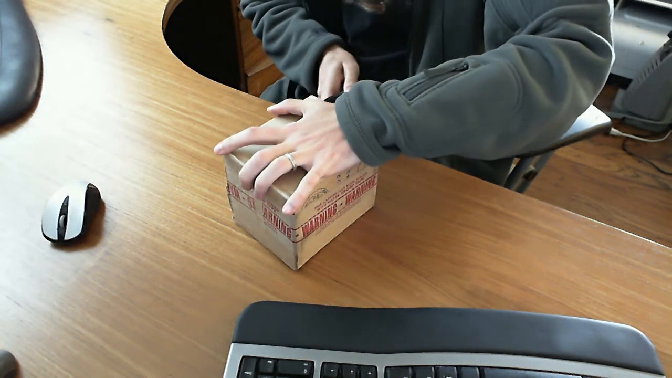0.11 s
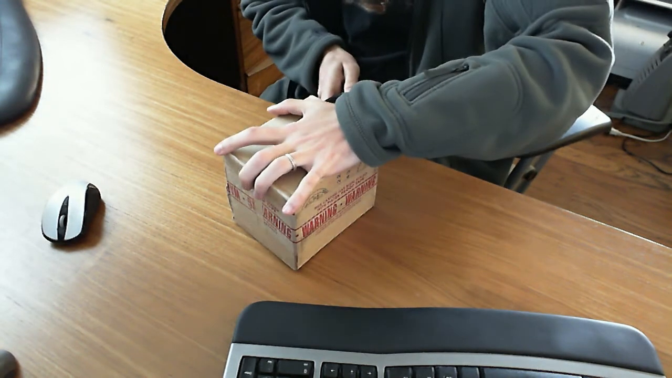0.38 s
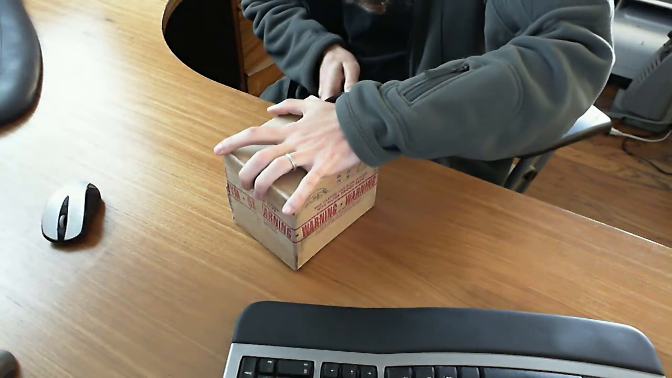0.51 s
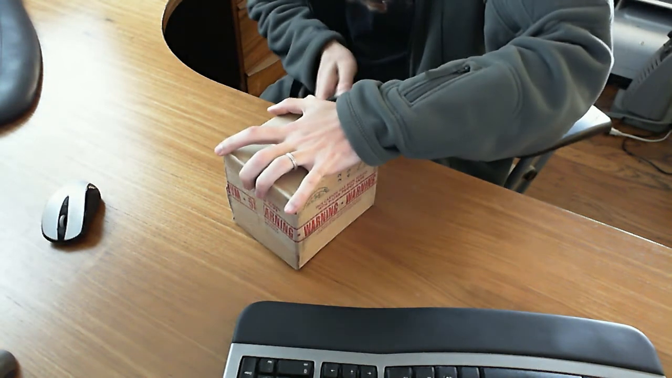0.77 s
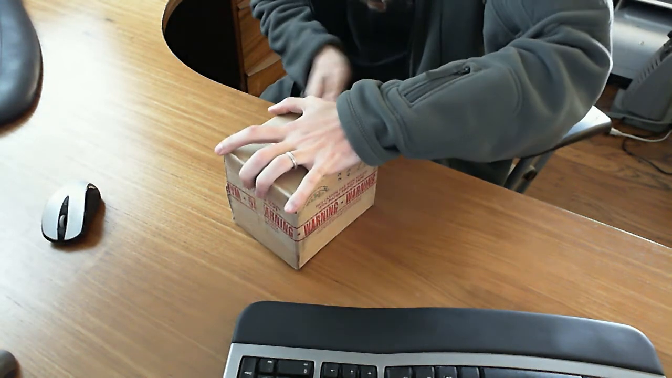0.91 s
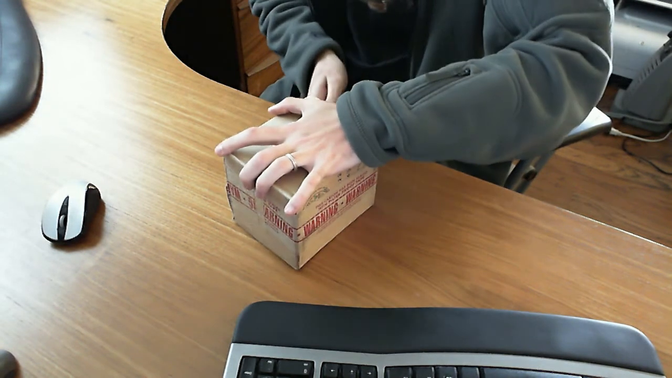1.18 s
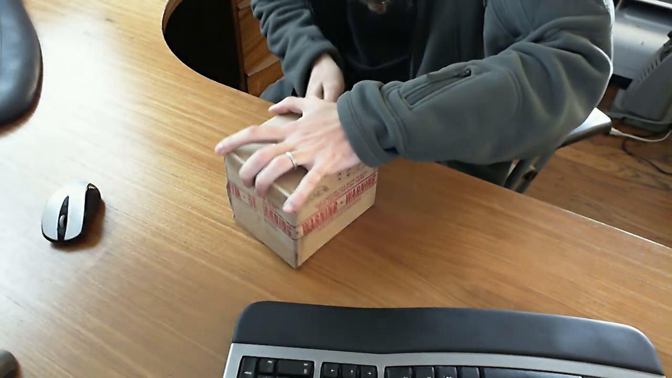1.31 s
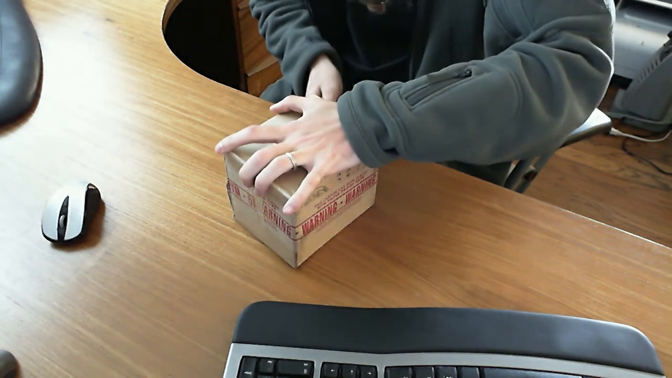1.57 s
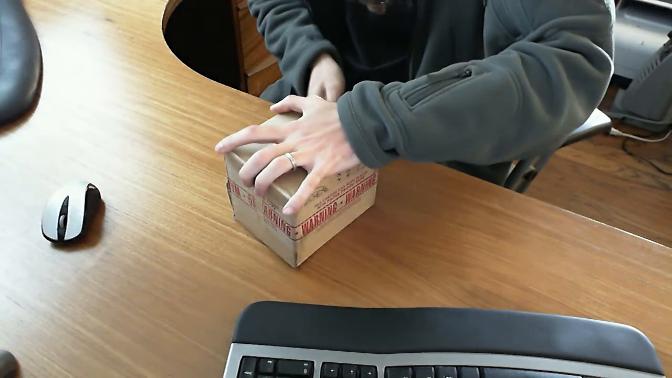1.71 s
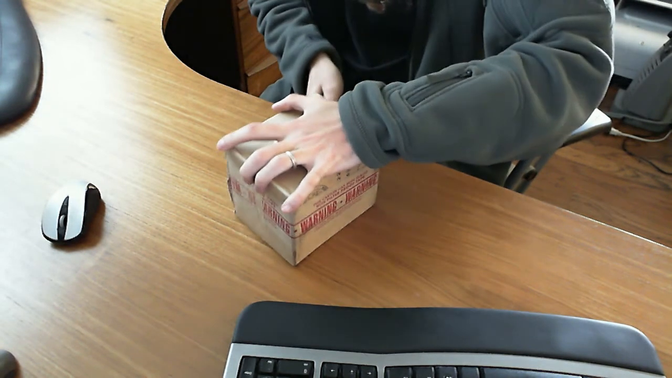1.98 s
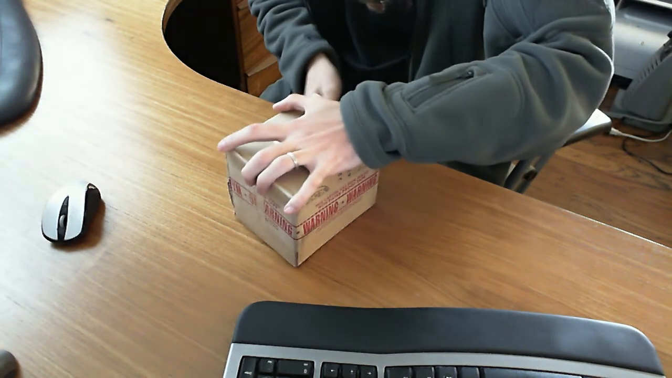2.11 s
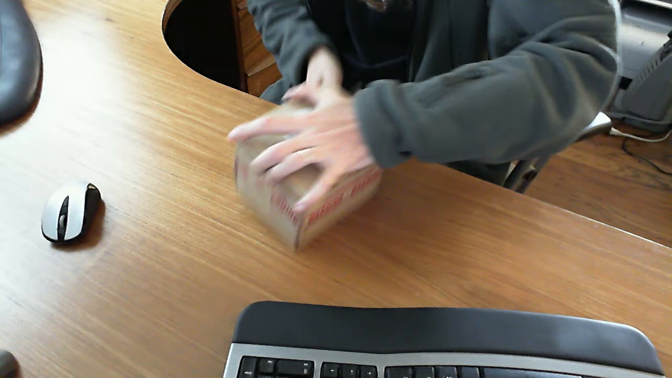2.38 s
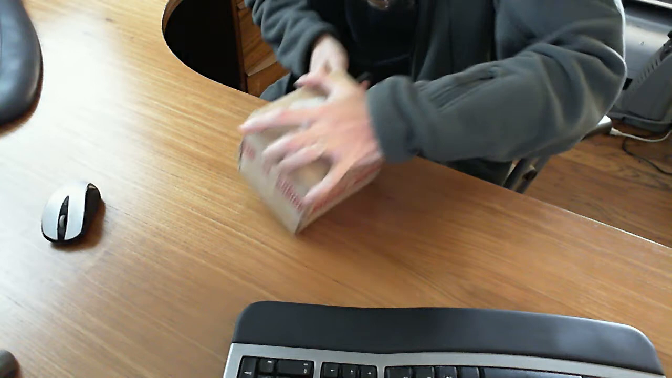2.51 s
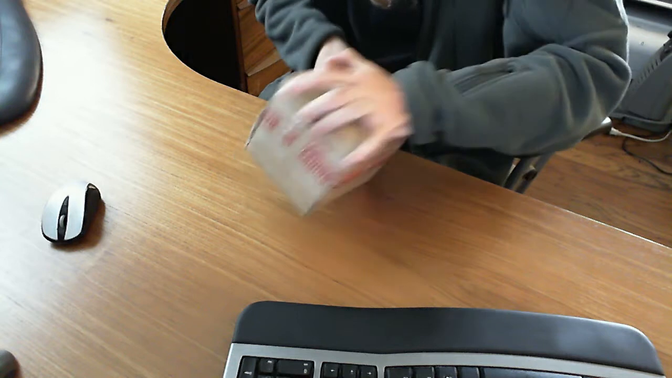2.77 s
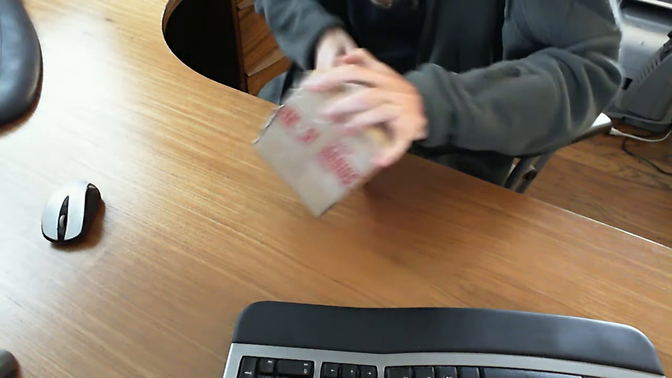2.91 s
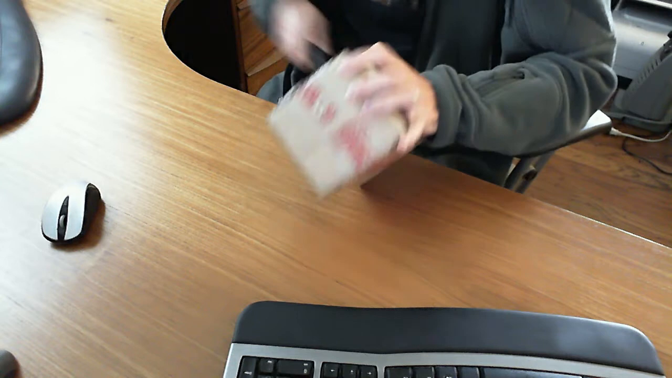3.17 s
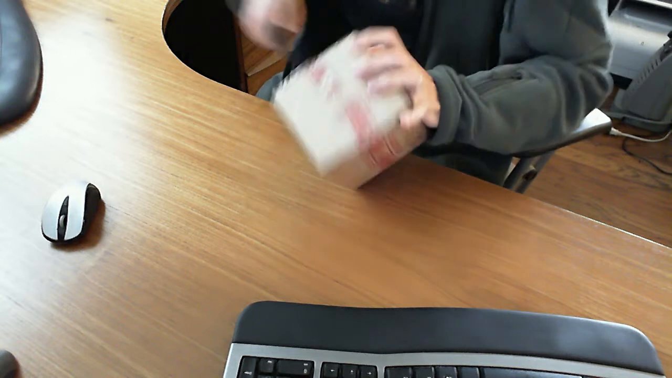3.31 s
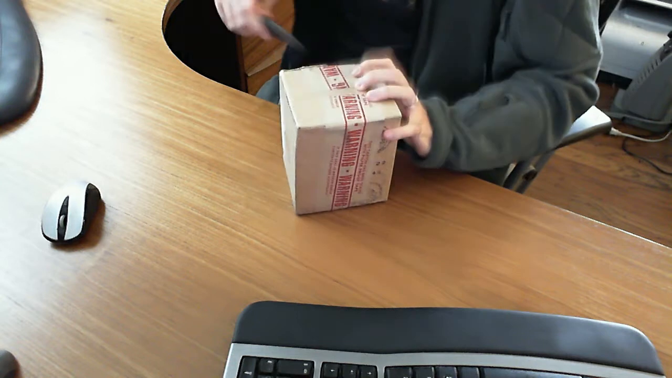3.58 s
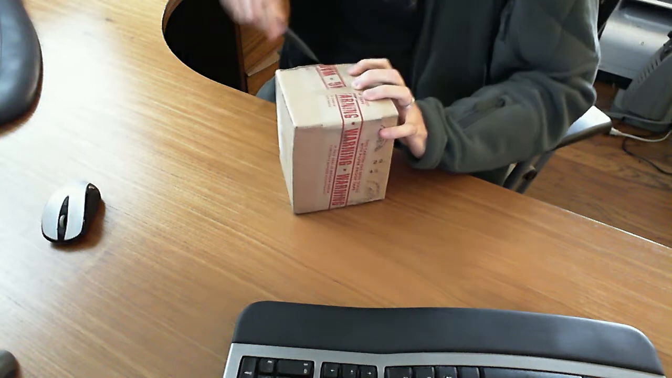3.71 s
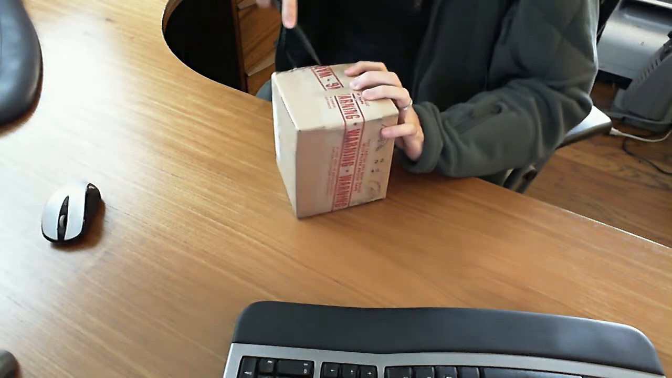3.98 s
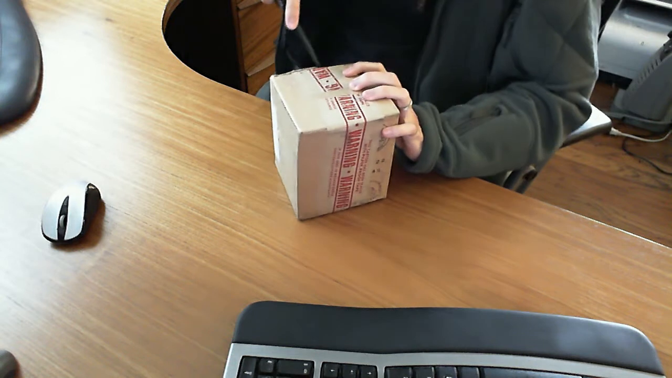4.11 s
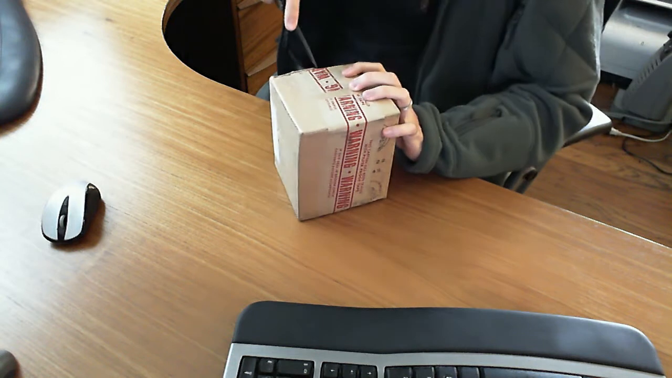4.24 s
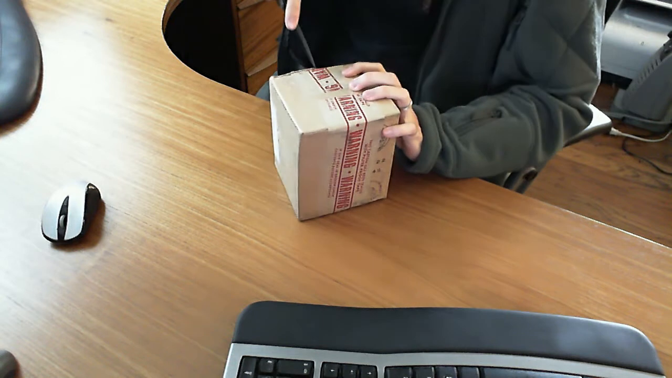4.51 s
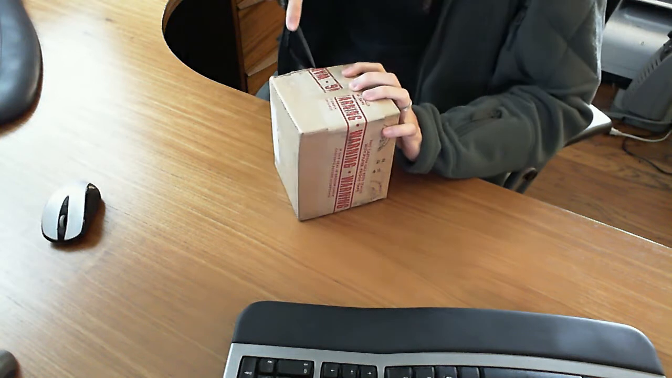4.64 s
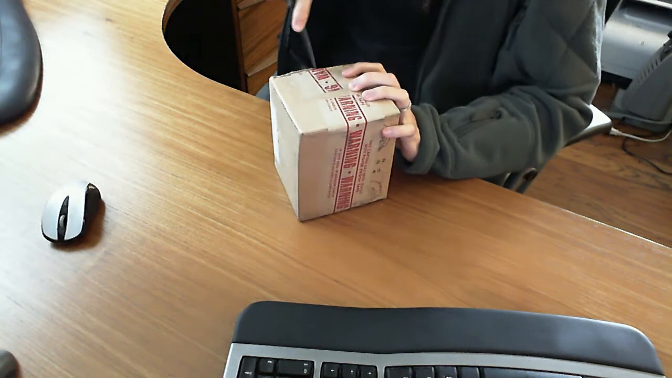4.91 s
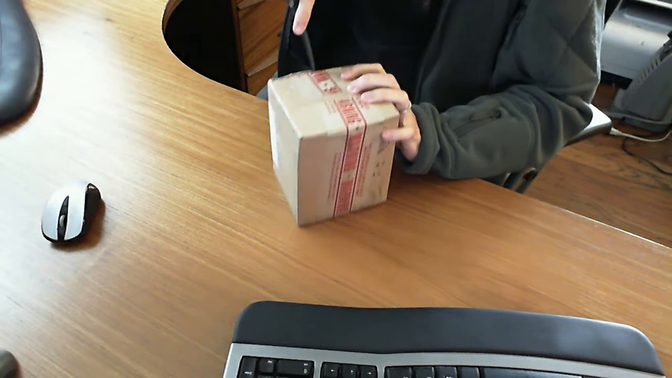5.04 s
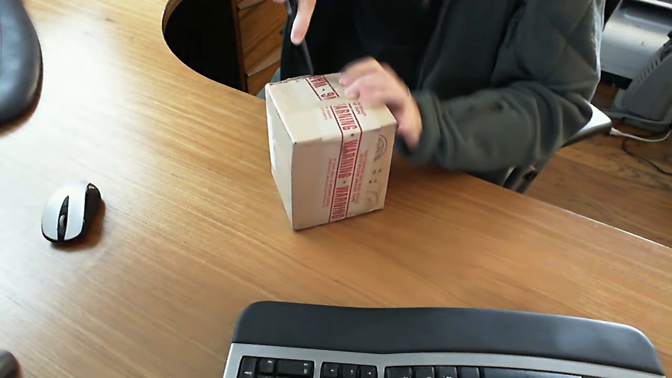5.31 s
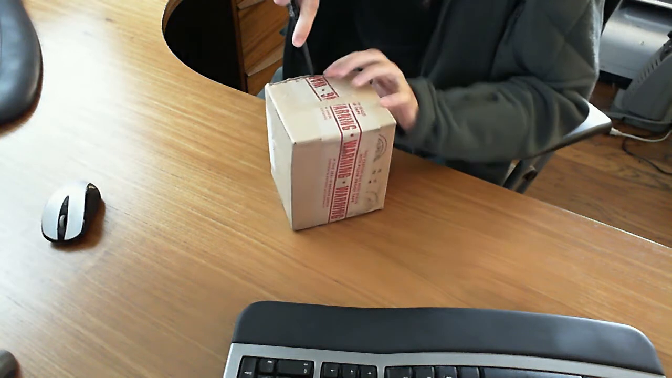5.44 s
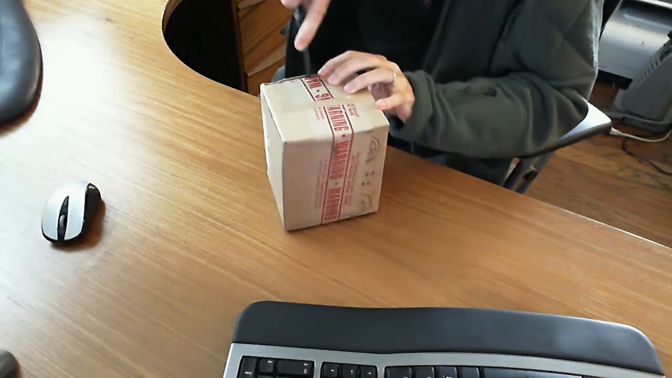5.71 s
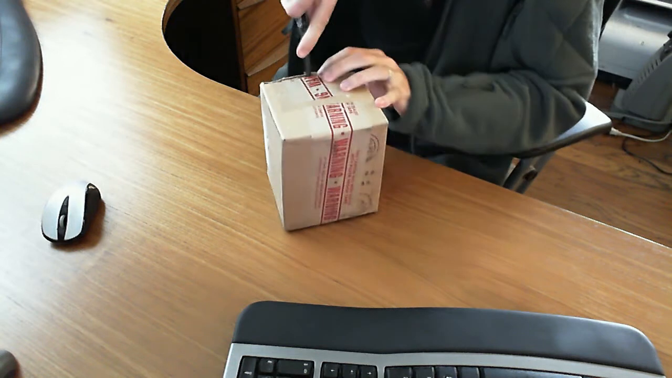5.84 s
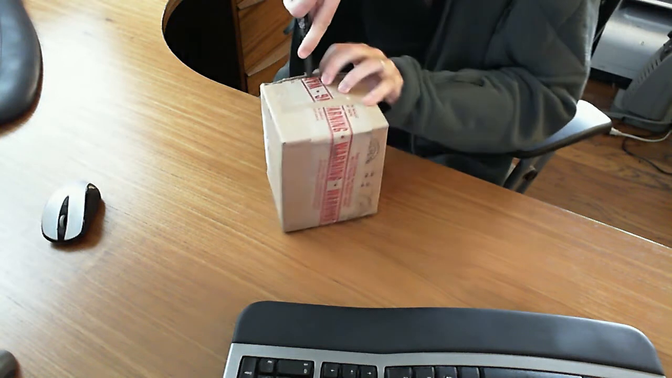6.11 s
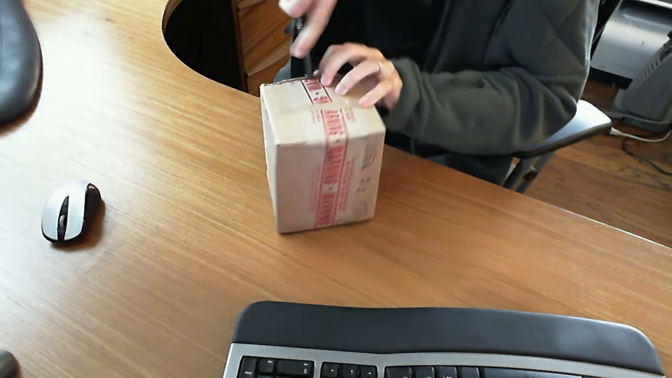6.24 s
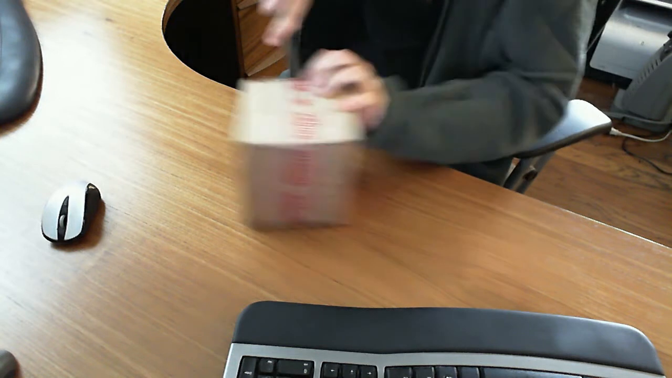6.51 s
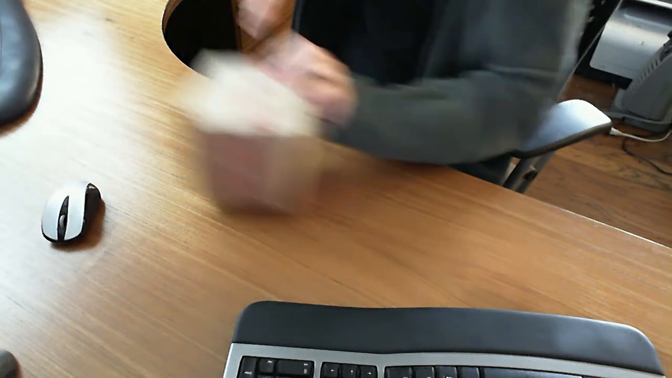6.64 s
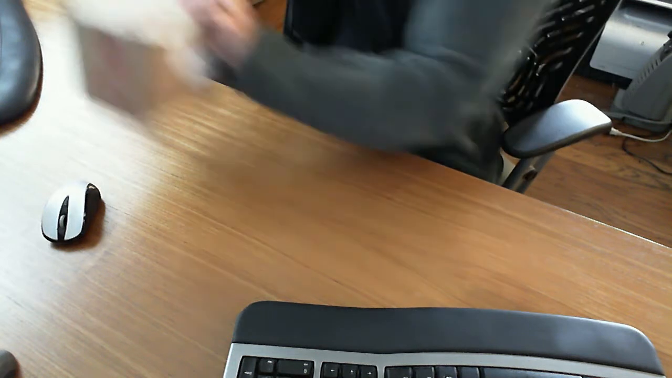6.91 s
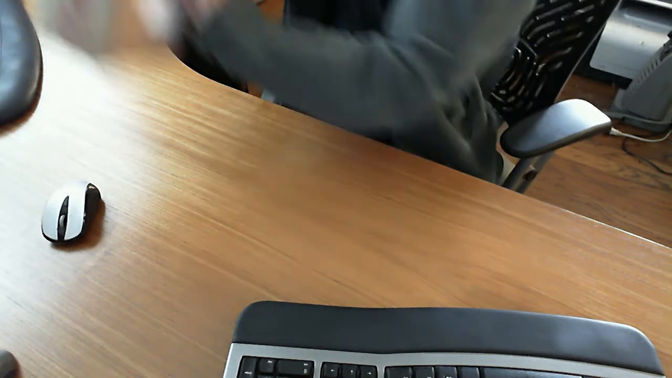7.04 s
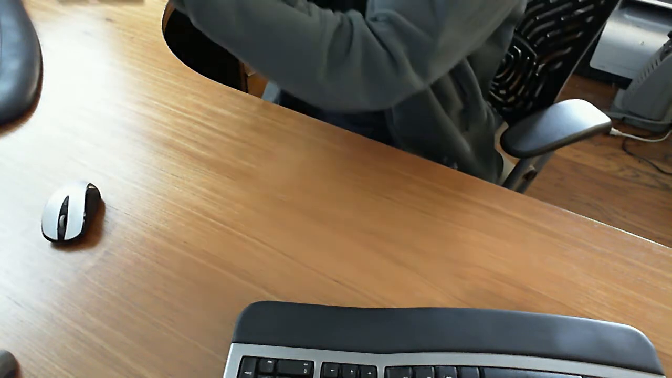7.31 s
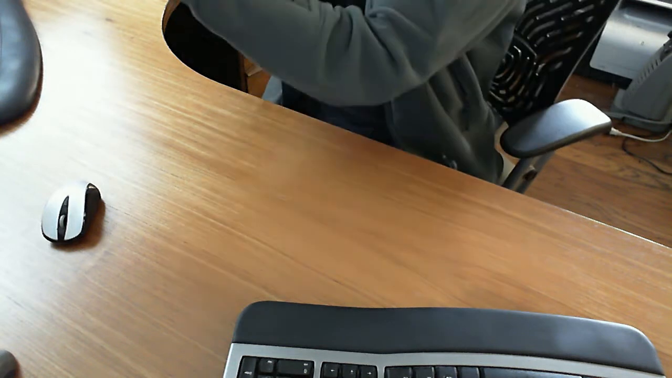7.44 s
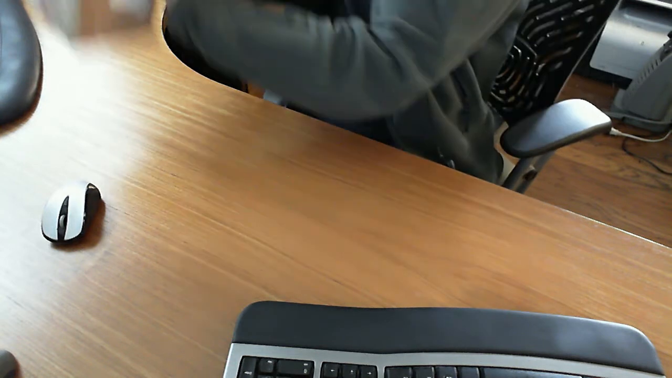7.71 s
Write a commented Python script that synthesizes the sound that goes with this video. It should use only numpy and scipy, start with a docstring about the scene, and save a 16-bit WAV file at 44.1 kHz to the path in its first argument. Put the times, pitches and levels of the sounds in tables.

```python
"""Room hum, faint fan lines, hiss and a pulsing sensor whine come first, as heard by a webcam microphone.
Nails and a blade then scrape tape on a small cardboard box: clumpy noise through film, nail and box colours.
Tape snaps are short noise cracks; knocks, landings and sliding drive resonances of the box and wooden desk.
Jolts make the desk tremble, a small quiet room answers the hits, and a slowly shifting offset is added."""
import sys
import numpy as np
from scipy import signal
from scipy.fft import rfft, irfft, next_fast_len
from scipy.io import wavfile
from scipy.ndimage import uniform_filter1d, map_coordinates

SR = 44100
rng = np.random.default_rng(int(sys.argv[2]) if len(sys.argv) > 2 else 0)


def boost(x):
    """Linear amplitude factor 10**(x/20) for a level x in decibels (scalar or array-like)."""
    u = np.asarray(x, float) / 20
    return 10 ** u


def dump_mix(stems):
    """Bounce the given channels to the path in sys.argv[1] as a 16-bit WAV at rate SR."""
    frames = np.atleast_2d(stems).T  # one column per channel
    limited = np.clip(frames, -1, 1)  # hard clip at full scale
    pcm = np.round(limited * 32767).astype(np.int16)
    wavfile.write(sys.argv[1], SR, pcm)


N = 342419  # length [samples]
TIME = np.arange(N) / SR  # [s]
STEPS = np.arange(0, N + 32, 32) / SR  # coarse clock for gains [s]


def unit(x):
    """Scale to rms 1."""
    return x / np.sqrt(np.mean(x ** 2) + 1e-20)


def along(points, hz):
    """Read a (frequency, value) curve on a log frequency axis."""
    f, value = np.transpose(points)
    return np.interp(np.log(hz + 1), np.log(f + 1), value)


def curves(rows):
    """One value per sample for each column after the time."""
    s, *columns = np.transpose(rows)
    return [np.interp(TIME, s, column) for column in columns]


def wobble(rate):
    """A smooth random curve with rate knots a second."""
    knots = rng.standard_normal(int(N * rate / SR) + 4)
    return map_coordinates(knots, [np.arange(N) * rate / SR])


def filtered(x, response):
    """Pass x through a complex response of frequency."""
    m = next_fast_len(N + SR // 2)
    return irfft(rfft(x, m) * response(np.fft.rfftfreq(m, 1 / SR)), m)[:N]


def modes(table, turn=-1):
    """Sum of resonances: neighbours swing in opposite phase (-1) or start together under a blow (1)."""
    def response(f):
        total = 0
        for k, (centre, width, db) in enumerate(table):
            damping = 1j * f * width
            total = total + turn ** k * boost(db) * damping / (centre ** 2 - f ** 2 + damping)
        return total
    return response


def push(s, db, ms):
    """A blow is a smooth raised-cosine force pulse; longer contact makes it duller."""
    force = np.zeros(N)
    shape = np.hanning(int(ms * SR / 1000) + 3)
    force[round(s * SR):][:len(shape)] = boost(db) * shape / shape.sum()
    return force


def summed(rest_db, parts):
    """Gain per sample: the power of a resting level plus that of all parts."""
    power = boost(rest_db) ** 2 + sum(part ** 2 for part in parts)
    return np.interp(TIME, STEPS, np.sqrt(power))


def swell(s, length, db):
    """A stroke presses in, is loudest at s and lets off."""
    edge_db, roundness = 12, 1.28  # drop at the stroke's ends; 1 is a pointed top, 2 a round one
    rise_share = 0.44  # part of the length spent rising
    side = length * np.where(STEPS < s, rise_share, 1 - rise_share)
    return boost(db - edge_db * np.abs((STEPS - s) / side) ** roundness)


def settle(s, db, t60, attack):
    """Quick rise, then a steady fade."""
    t = np.maximum(STEPS - s, 0)
    return boost(db - 60 * t / t60) * (1 - np.exp(-t / attack))


# spectrum of room hum and microphone hiss: (frequency [Hz], relative level per Hz [dB])
AIR = [(6, -26), (10, -3), (20, -15), (32, -21), (118, -18), (240, -22), (600, -28.5), (1270, -33.5),
       (2500, -37.5), (5300, -39.5), (8100, -38), (12000, -37.5), (15800, -34)]
# fan lines: (frequency [Hz], typical sine amplitude [dB])
FAN_LINES = [(180, -56.5), (235, -60)]


def air():
    """Shaped noise makes hum and hiss; fan lines waver in level and phase."""
    noise = unit(filtered(rng.standard_normal(N), lambda hz: boost(along(AIR, hz))))
    fan = 0
    for hz, db in FAN_LINES:
        level = boost(db + 2.1 * wobble(6.1))
        fan = fan + level * np.sin(2 * np.pi * hz * TIME + 0.26 * wobble(6.7))
    return boost(-45.5) * noise + fan


def whine():
    """The sensor's line clock leaks in while a frame is read and rests between frames."""
    line_hz, level_db = 6750.3, -53.5  # level of each of the two sines
    frame_s, read_from_s, read_for_s = 2 / 15, 0.12, 0.107
    reading = (TIME - read_from_s) % frame_s < read_for_s
    gate = uniform_filter1d(1.0 * reading, size=40)
    phase = 2 * np.pi * line_hz * TIME
    return gate * boost(level_db) * (np.sin(phase) + np.sin(2 * phase))


# added offset: (time [s], offset [full scale])
OFFSET = [(0, -.0537), (.86, -.0537), (.96, -.042), (3.5, -.042), (3.62, -.032), (5.95, -.032),
          (6.32, -.0176), (7.8, -.0176)]


def offset():
    """A constant shift of the waveform that glides between plateaus."""
    return curves(OFFSET)[0]


# box wall modes: (frequency [Hz], width [Hz], level [dB])
BOX = [(232.7, 56, 9), (347, 107, 4.5), (431, 60, 5), (480, 51, 5), (540, 66, 2.5), (640, 82, 2),
       (838, 152, -1), (1078, 94, -2), (1300, 124, -4.5), (1712, 170, -5), (2360, 280, -6.5),
       (3280, 360, -4.5)]


def wall(hz, spread):
    """Box modes heard from one wall: each loses spread dB per octave away from its pitch."""
    return modes([(c, w, db - spread * abs(np.log2(c / hz))) for c, w, db in BOX])


def grit(spiky_db, clump_db):
    """Stick-slip grains: noise whose size jumps from slip to slip and comes in clumps."""
    return rng.standard_normal(N) * boost(spiky_db * wobble(900) + clump_db * wobble(60))


def patchy(x, depth_db):
    """Narrow bands come and go as the material is held differently."""
    z = signal.stft(x, nperseg=512)[2]
    field = uniform_filter1d(rng.standard_normal(z.shape), size=3, axis=0)  # across frequency
    field = uniform_filter1d(field, size=16, axis=1)  # across time
    return unit(signal.istft(z * boost(depth_db * unit(field)), nperseg=512)[1][:N])


def tails(hits, under_db, t60):
    """Gains of the fading noise tail that follows each hit, at a level set by the hit."""
    return [settle(s, db + under_db, t60, attack=0.002) for s, db, _ in hits]


# strokes of nail, blade or hand: (loudest moment [s], length [s], tape hiss [dB],
# nail scrape relative to tape [dB], box body relative to tape [dB])
STROKES = [(0.606, 0.16, -42.5, -9.5, -0.5), (0.716, 0.4, -47, -11, -6), (0.846, 0.16, -39, -14, -11),
           (.888, 0.019, -29, 0, -7), (0.944, 0.15, -32.5, -6.5, -8.5), (1.076, 0.12, -27, -4.5, -6.5),
           (1.235, 0.16, -31, -4.5, -10.5), (1.378, 0.13, -31.5, -9.5, -15), (1.505, 0.12, -32.5, -5, -5),
           (1.691, 0.13, -32.5, -6.5, -10), (1.796, 0.15, -35.5, -7, -7), (2.105, 0.13, -39.5, -5.5, -7.5),
           (2.39, .3, -39, -6.5, -6.5), (2.763, 0.13, -44.5, -6, -21), (2.87, 0.58, -45, -9.5, -6.5),
           (3.315, 0.18, -43.5, -14, -15), (3.432, 0.31, -38.5, -17.5, -23), (3.51, 0.072, -33.5, -20, -12),
           (5.07, 0.44, -50.5, -5.5, -2), (5.37, 0.25, -48.5, -10, -8), (5.757, 0.15, -31.5, -10.5, -8),
           (6.053, 0.25, -44.5, -9, 5.5), (6.5, 0.72, -42, -5, -5), (6.721, 0.11, -41, 1.5, -6),
           (6.792, 0.18, -49.5, -1.5, 6.5), (7.004, 0.31, -51, -7.5, -5), (7.293, 0.057, -46, -6, -18),
           (7.433, 0.26, -47, -12, -7), (7.732, 0.053, -43.5, -17, -1.5)]
# tape hiss colour: (frequency [Hz], relative level per Hz [dB])
TAPE = [(2650, -43), (4500, -8), (5510, -9), (5990, -7), (6490, -4.5), (8370, 0), (10400, -5), (11900, -2),
        (13700, -9), (16000, -21.5)]
# nail and film modes: (frequency [Hz], width [Hz], relative level [dB])
NAIL = [(1464, 590, -1.5), (2286, 240, -1.5), (2900, 980, -3), (3830, 445, 4), (4640, 1400, -3.5)]


def rubbing():
    """Grains hiss in the tape film, rasp under the nail and drive the box walls; hits leave noise tails."""
    tape_parts = [swell(s, n, db) for s, n, db, _, _ in STROKES] + tails(SNAPS, -29.5, t60=0.32)
    nail_parts = [swell(s, n, db + up) for s, n, db, up, _ in STROKES] + tails(SNAPS, -41, t60=0.32)
    box_parts = [swell(s, n, db + up) for s, n, db, _, up in STROKES] + tails(KNOCKS, -32, t60=0.26)
    tape = filtered(grit(spiky_db=2.5, clump_db=1.2), lambda hz: boost(along(TAPE, hz)))
    nail = filtered(grit(spiky_db=2.5, clump_db=1.5), modes(NAIL))
    box = filtered(grit(spiky_db=1.0, clump_db=0.5), wall(574, spread=4.5))
    # resting levels are a faint steady noise floor
    tape = summed(-68, tape_parts) * patchy(tape, depth_db=2.1)
    nail = summed(-66.5, nail_parts) * patchy(nail, depth_db=3)
    box = summed(-57.5, box_parts) * patchy(box, depth_db=2.5)
    return tape + nail + box


# arms and box jolt the desk: (time [s], sway level [dB], boom level [dB], t60 [s])
JOLTS = [(.88, -42, -47.5, 1.7), (1.48, -30.5, -34.5, 0.62), (1.65, -46, -63, 2.2), (3.44, -23, -46, .6),
         (3.51, -30, -23, 0.62), (5.7, -45, -42, 1.5), (6.0, -45, -39.5, 2.3), (6.25, -40, -37, 0.55),
         (6.7, -62, -61, 1.8), (7.7, -52, -52, 1.2)]
# desk frame modes: (frequency [Hz], width [Hz], level [dB])
SWAY = [(30, 21, -3.5), (51.6, 26, 2.5)]
# desk top modes: (frequency [Hz], width [Hz], level [dB])
DESK = [(118, 12.6, -3), (142, 16, 2.5), (170.5, 30, -0.5), (249, 51, -3), (324, 114, -11.5)]


def tremble():
    """Noise through frame and top modes: the desk stirs at rest and trembles after each jolt."""
    attack = 0.027  # [s]
    sway_gain = summed(-55, [settle(s, db, t60, attack) for s, db, _, t60 in JOLTS])
    boom_gain = summed(-59, [settle(s, db, t60, attack) for s, _, db, t60 in JOLTS])
    sway = unit(filtered(rng.standard_normal(N), modes(SWAY)))
    boom = unit(filtered(rng.standard_normal(N), modes(DESK)))
    return sway_gain * sway + boom_gain * boom


# tape and nail snaps: (time [s], level [dB], centre frequency [Hz])
SNAPS = [(0.427, -19.5, 6360), (0.8731, 6, 8100), (0.874, 1, 3470), (0.88, 4.5, 10700), (0.886, -6, 11100),
         (3.021, -7, 8900), (3.0281, -15, 8560), (3.0324, -24, 8170), (3.0394, -15, 8180),
         (3.452, -22, 3460), (3.5074, -18, 5200), (3.5224, -2.5, 3960), (3.537, -15, 6970),
         (3.8204, -25.5, 3320), (4.4727, -19, 6700), (5.2769, -18.5, 7500), (5.2852, -19.5, 6900),
         (5.293, -22.5, 4300), (5.6752, -10, 7350), (5.6977, -4, 7200), (5.7067, -14, 9050),
         (5.7254, -11, 7300), (6.2905, -11.5, 13700), (6.455, -26, 5000), (7.377, -11, 6500),
         (7.3805, -16, 6500), (7.3862, -15, 10500), (7.3885, -13.5, 8000), (7.715, -14.5, 4300),
         (7.7186, -20, 4300), (7.722, -10, 9000), (7.7265, -13, 11000), (7.729, -16, 8800)]


def snaps():
    """Glue lets go: a sharp, fast-fading noise crack near one pitch."""
    out = np.zeros(N + SR)
    t = np.arange(SR // 8) / SR
    f = np.fft.rfftfreq(len(t), 1 / SR)
    crack = 1.085 * boost(-60 * t / 0.013) * (1 - np.exp(-t / 0.001))
    edges = f / (f + 3000) / (1 + (f / 13500) ** 8)  # thins out the lows and the extreme top
    for s, db, hz in SNAPS:
        damping = 1j * f * 1800
        colour = 0.23 + damping / (hz * hz - f * f + damping)
        film = unit(irfft(rfft(rng.standard_normal(len(t))) * colour * edges, len(t)))
        out[round(s * SR):][:len(t)] += boost(db - 10) * crack * film
    return out[:N]


# knocks on the box walls: (time [s], level before force gain [dB], pitch of the struck wall [Hz])
KNOCKS = [(.427, -26.5, 597), (0.8736, -2.5, 640), (.891, -12.5, 523), (1.5, -41, 640), (1.689, -16.5, 540),
          (3.0169, -11, 1300), (3.019, -19.5, 650), (3.0221, -12.5, 660), (3.0235, -7, 1320),
          (3.038, -20, 1300), (3.4515, -12.5, 796), (3.5235, -2.5, 740), (3.538, -9, 506),
          (5.276, -24.5, 507), (5.286, -21.5, 450), (5.294, -26, 1500), (5.677, -18.5, 770),
          (5.698, -19, 770), (5.722, -19, 720), (5.76, -26, 720), (5.848, -22.5, 600), (5.871, -23, 590),
          (6.1089, -11.5, 480), (6.133, -32, 480), (6.151, -7, 530), (6.197, -24, 416), (6.267, -23, 518.5),
          (6.293, -2.5, 550), (6.309, -11, 640), (7.379, -28, 620)]


def knocks():
    """Each short blow rings the box from its own wall."""
    force_gain_db = 26
    out = 0
    for s, db, hz in KNOCKS:
        out = out + filtered(push(s, db + force_gain_db, ms=0.14), wall(hz, spread=10.2))
    return out


# room decay: (frequency [Hz], t60 [s])
ROOM = [(150, 0.41), (1000, 0.37), (10000, 0.31)]


def room(x):
    """A noise tail, slightly delayed, in which each frequency dies at its own speed."""
    hz, t, z = signal.stft(rng.standard_normal(SR // 2), SR, nperseg=256)
    fade = boost(-60 * t / along(ROOM, hz)[:, None])
    tail = signal.istft(z * fade, SR, nperseg=256)[1]
    delayed = np.pad(x, (200, 0))  # [samples]
    return signal.fftconvolve(delayed, tail / np.linalg.norm(tail))[:N]


# box corners land on the desk: (time [s], level before force gain [dB], contact time [ms])
THUMPS = [(3.452, -12.5, 2.4), (3.526, 2.5, 3.4), (3.537, -8, 3.9), (3.566, -11, 3.65), (3.609, -14, 2.2)]


def thumps():
    """Each landing pushes the desk top, whose modes boom."""
    force_gain_db, radiates_hz = 38, 75  # the top sends little sound into the air below this

    def response(f):
        radiation = (1j * f / (radiates_hz + 1j * f)) ** 2
        return modes(DESK, turn=1)(f) * radiation

    return boost(force_gain_db) * filtered(sum(push(*row) for row in THUMPS), response)


# the box base judders over the desk: (time [s], level [dB], typical slips per second [1/s],
# wall pitch share [0 low - 1 high])
DRAG = [(5.9, -90, 70, 0.34), (5.94, -44, 67, 0), (5.985, -35, 125, 0), (6.05, -28, 89, 0),
        (6.085, -31.5, 61, 0), (6.11, -90, 50, 0), (6.28, -90, 86, .4), (6.32, -46, 90, 0.23),
        (6.41, -38, 119, 0.81), (6.46, -51, 85, 0.99), (6.56, -94, 97, .9)]


def drag():
    """Uneven slips of the base ring low and high walls in a shifting blend."""
    db, rate, share = curves(DRAG)
    uneven_rate = rate * boost(0.8 * wobble(40))
    count = np.floor(np.cumsum(uneven_rate) / SR)
    slips = np.diff(count, prepend=0) * boost(2.3 * wobble(120))
    slips = slips + 0.0088 * rng.standard_normal(N)  # fine steady noise under the slips
    low = unit(filtered(slips, wall(448, spread=17.4)))
    high = unit(filtered(slips, wall(713, spread=15)))
    return boost(db) * ((1 - share) * low + share * high)


def scene():
    """Hits and landings ring in the room; the steadier sounds are added without it."""
    impacts = snaps() + knocks() + drag() + thumps()
    return (impacts + boost(-8.0) * room(impacts) + tremble() + rubbing() + air())[None]


def low_pass(x):
    """Removes everything above the highest recorded frequency."""
    return signal.sosfilt(signal.butter(12, 16650, fs=SR, output="sos"), x)


def record(dry):
    """The webcam adds its whine and an offset; a steep lowpass takes scene and whine above 15.8 kHz away."""
    lowpass_hz = 15830
    heard = filtered(dry[0] + whine(), lambda hz: hz < lowpass_hz)
    mix = (heard + offset())[None]
    return low_pass(mix)


dry = scene()
out = record(dry)
dump_mix(out)
```